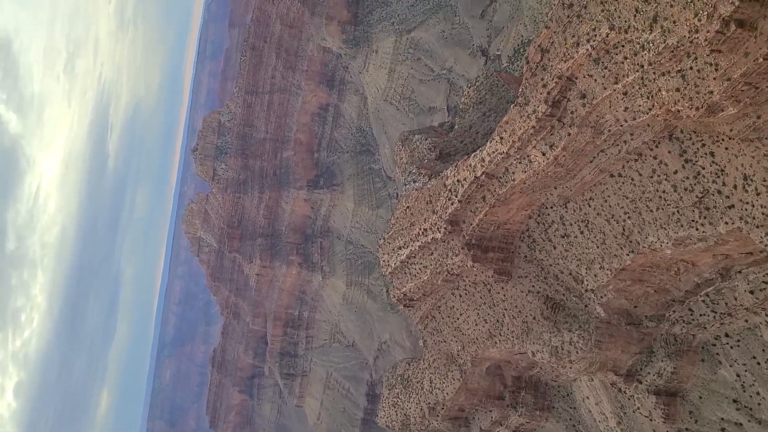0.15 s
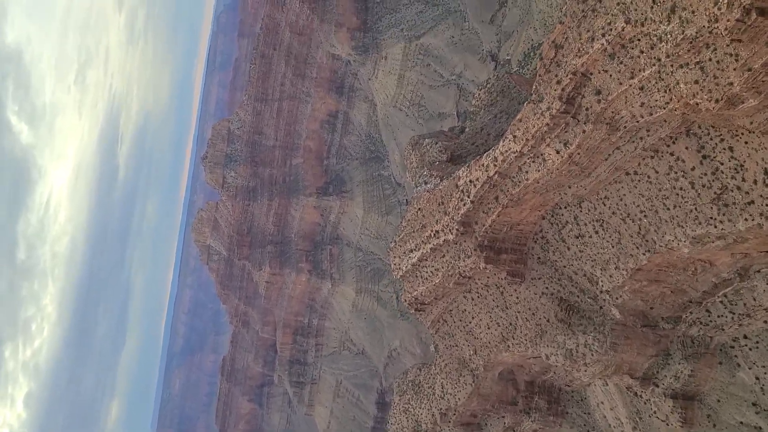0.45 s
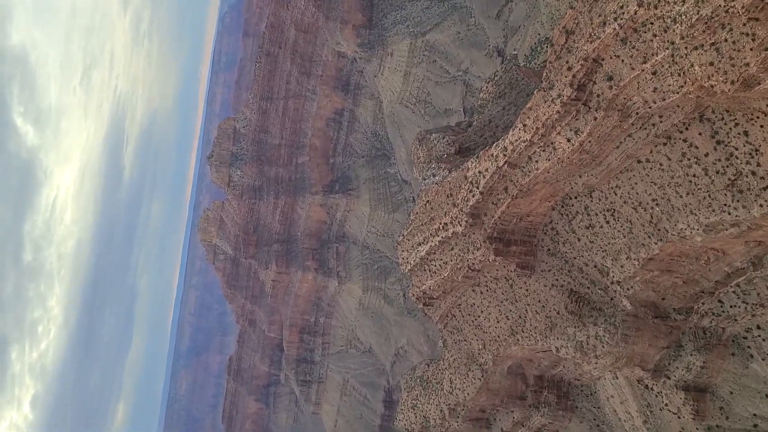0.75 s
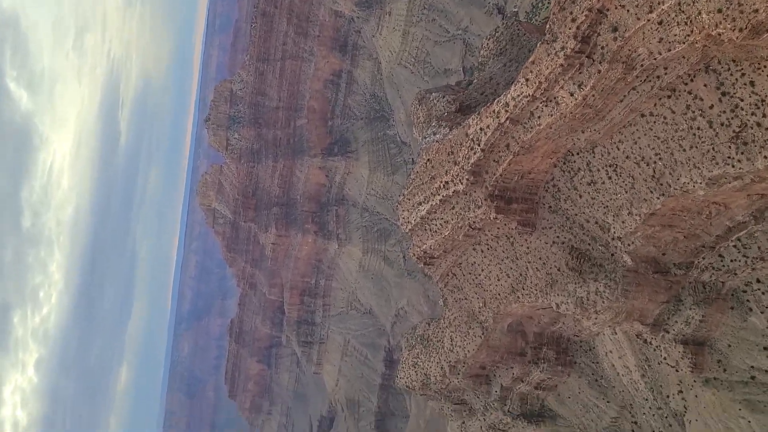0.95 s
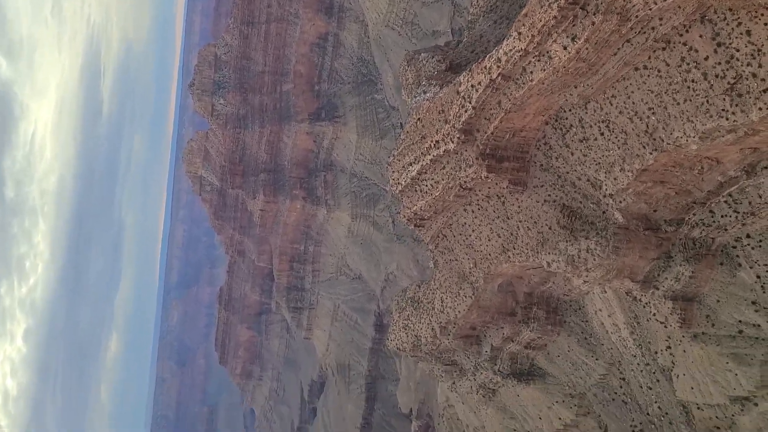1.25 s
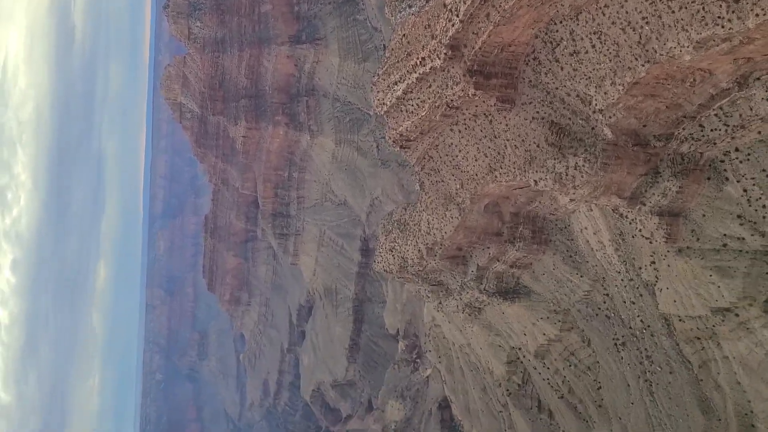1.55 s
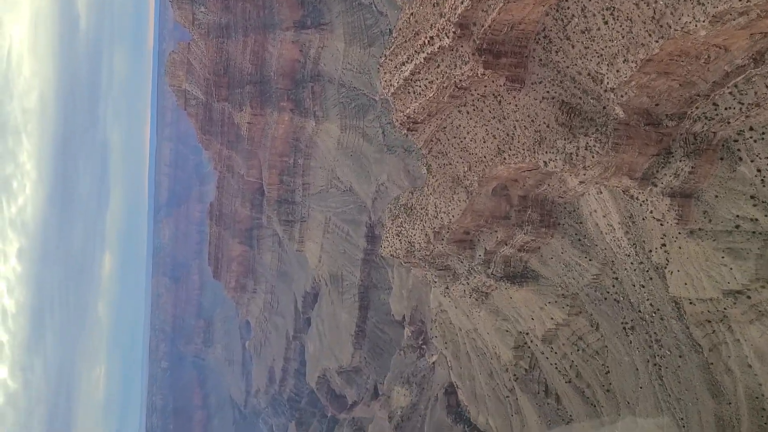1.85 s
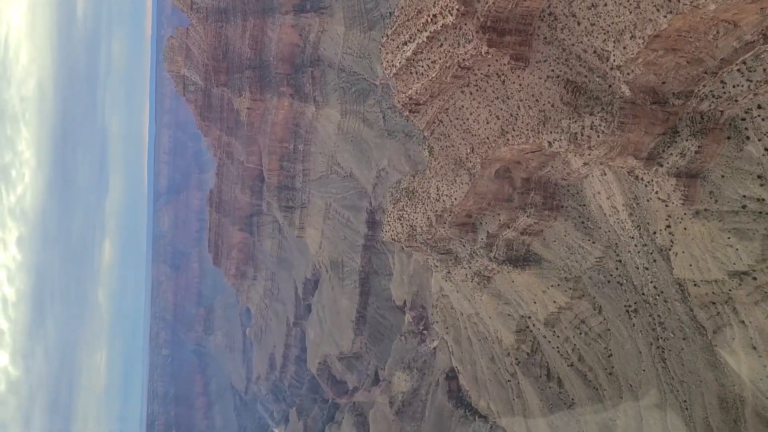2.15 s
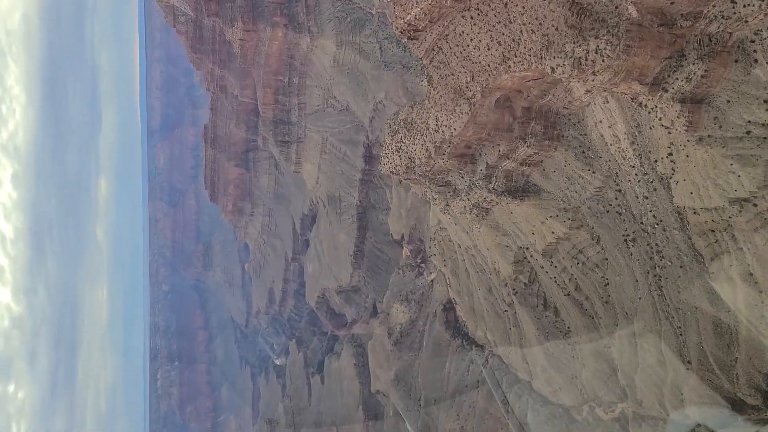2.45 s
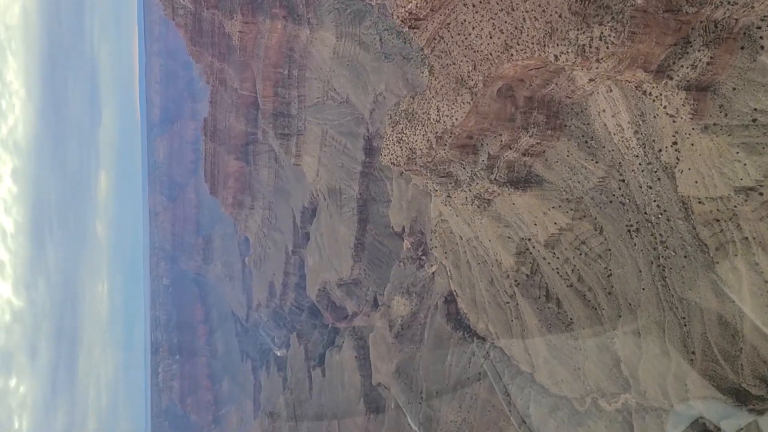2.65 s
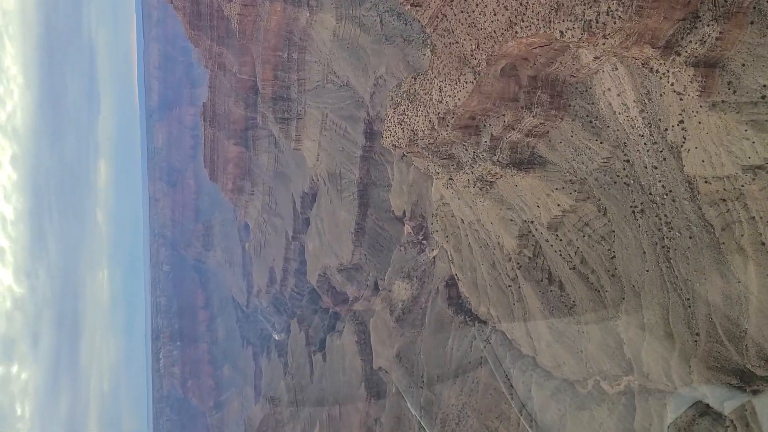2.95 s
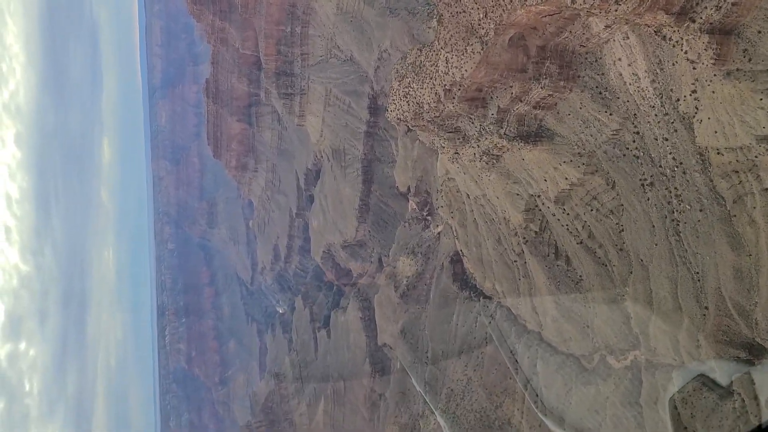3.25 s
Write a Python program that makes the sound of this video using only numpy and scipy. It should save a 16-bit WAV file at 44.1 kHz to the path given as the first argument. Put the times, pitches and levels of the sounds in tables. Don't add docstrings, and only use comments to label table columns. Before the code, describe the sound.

A loud steady helicopter cabin drone over a canyon: deep blade thumping shakes the hull, gears whine sharply above it, air roars and a faint turbine sings on top; close microphones, bass centred.

```python
import sys
import numpy as np
from scipy import signal
from scipy.fft import rfft, irfft
from scipy.io import wavfile

SR = 44100
rng = np.random.default_rng(int(sys.argv[2]) if len(sys.argv) > 2 else 0)


def volts(x):
    e = np.asarray(x, float) / 20
    return 10 ** e


def to_wav(s):
    ch = np.atleast_2d(s).T
    pcm = np.round(np.clip(ch, -1, 1) * 32767)
    wavfile.write(sys.argv[1], SR, pcm.astype(np.int16))


N = 149940

TEETH, BLADES = 100, 3
THROB_TURNS, CHOP_TURNS = -.083, .6


def read(points, hz):
    f, value = np.transpose(points)
    return np.interp(np.log(hz + 1), np.log(f + 1), value)


def drift(rate_hz):
    t = np.arange(0, N + 200, 200) / SR
    f = np.geomspace(.2, rate_hz, 16)[:, None]
    sines = np.sin(2 * np.pi * (f * t + rng.random((16, 1))))
    slow = (sines / np.sqrt(f)).sum(0)
    return np.interp(np.arange(N) / SR, t, (slow - slow.mean()) / slow.std())


def tone(turns):
    return np.sqrt(2) * np.cos(2 * np.pi * turns)


def stereo(left, right):
    return np.array([[left], [right]])


def wash(colour_db, lean):
    # frequency in Hz, correlation from -1 to 1.
    likeness = [(60, .98), (250, .9), (345, .52), (520, .66), (690, 0), (900, -.58), (1150, -.55),
                (1350, -.2)]
    hz = np.fft.rfftfreq(N, 1 / SR)
    a, b = rfft(rng.standard_normal((2, N)))
    same = read(likeness, hz) / (1 + (hz / 4000) ** 2)
    half_lean_db = read(lean, hz) / 2
    left = a * volts(half_lean_db)
    right = (same * a + np.sqrt(1 - same ** 2) * b) * volts(-half_lean_db)
    return irfft(np.array([left, right]) * volts(colour_db(hz)) * np.sqrt(SR / 2), N)


def rotor():
    # time in seconds, fifth tooth overtone in Hz, strength in dB.
    speed_curve = [
        (0, 3280.6, -41),
        (.75, 3281.9, -40),
        (1.1, 3281.2, -42.5),
        (1.5, 3279.8, -44),
        (2.4, 3280.1, -45),
        (2.85, 3281.6, -44.5),
        (3.4, 3281, -45.5),
    ]
    aligned_s = 1.7
    s, hz, db = np.transpose(speed_curve)
    t = np.arange(N) / SR
    turns = np.cumsum(np.interp(t, s, hz)) / (5 * TEETH * SR)
    strength_db = np.interp(t, s, db)
    return turns - turns[round(aligned_s * SR)], strength_db - strength_db.mean()


def airflow(turns):
    # frequency in Hz, density in dB per Hz.
    hull_boom = [(18, -48), (35, -51.5), (52, -43), (70, -37), (97, -37.5), (125, -43.5), (185, -48.5),
                 (300, -68)]
    # frequency in Hz, density in dB per Hz.
    cabin_roar = [(150, -55.5), (240, -43.5), (320, -51), (520, -52), (800, -54.5), (1250, -58.5),
                  (1550, -63), (6500, -90)]
    # frequency in Hz, width in Hz,
    # lift in dB (negative for a cut).
    panels = [(375, 41, 5), (662, 84, 3.5), (942, 46, 2), (1723, 90, 5), (2710, 140, 4), (2990, 240, 4.5),
              (3420, 31, -15)]
    # frequency in Hz, left minus right in dB.
    air_lean = [(160, 1), (260, -2), (450, 4), (700, 2.5), (1100, 3.5), (1700, 0.5), (2600, 4.5), (3600, 3)]

    def boom_db(hz):
        return read(hull_boom, hz) - 40 * (hz > 320)

    def roar_db(hz):
        ringing = sum(lift / (1 + (2 * (hz - f) / width_hz) ** 2) for f, width_hz, lift in panels)
        return read(cabin_roar, hz) + ringing - 40 * (hz < 90)

    chop = 1 + .04 * tone(BLADES * turns + CHOP_TURNS)
    return wash(boom_db, air_lean) + chop * wash(roar_db, air_lean)


def turbine(turns):
    # pitch in Hz, left level in dB, right level in dB,
    # pitch wander in Hz, level wander in dB, share of the swell from 0 to 1.
    compressor = [(11217, -54, -45.5, 2, 2.2, 1.0), (11757, -67, -58, 2.2, 2.5, .3),
                  (10680, -75, -66, 3, 3, 0)]
    # frequency in Hz, density in dB per Hz.
    hiss_colour = [(2000, -73), (3100, -69), (3700, -75), (5300, -79.5), (8000, -79.5), (11500, -77),
                   (14000, -81), (16000, -81)]
    # frequency in Hz, left minus right in dB.
    hiss_lean = [(2500, 2.5), (4000, 0), (6500, 2.5), (7800, 0), (9000, -4), (11500, -5), (14500, -3)]
    # time in seconds, level in dB.
    swell = [
        (0, -2),
        (.7, 2),
        (.9, -4),
        (1.42, -8),
        (1.5, 1),
        (1.85, 2),
        (1.95, -5),
        (2.37, 3),
        (3.4, -4),
    ]
    chop_depth, overtone_share, chop_from_hz, gust_db = .058, .45, 8500, .35

    blade = BLADES * turns + CHOP_TURNS
    beat = tone(blade) + overtone_share * (tone(2 * blade) + tone(3 * blade))
    chop = 1 + chop_depth * beat * (1 + .5 * drift(2))

    swell_db = np.interp(np.arange(N) / SR, *np.transpose(swell))
    tones = np.zeros((2, N))
    for hz, left_db, right_db, wander_hz, waver_db, share in compressor:
        level_db = stereo(left_db, right_db) + waver_db * drift(20) + share * swell_db
        cycles = np.cumsum(hz + wander_hz * drift(25)) / SR
        tones += volts(level_db) * tone(cycles + stereo(.2, 0))

    hiss = wash(lambda hz: read(hiss_colour, hz), hiss_lean)
    high_pass = signal.butter(2, chop_from_hz, 'high', fs=SR, output='sos')
    top = signal.sosfiltfilt(high_pass, hiss)
    return hiss - top + chop * volts(gust_db * drift(12)) * (tones + top)


def casing(turns):
    # frequency in Hz, width in Hz, left level in dB, right level in dB,
    # pitch wander in Hz.
    resonances = [(1305, 45, -39.5, -46, 4), (1366, 45, -35, -35.5, 13)]
    out = np.zeros((2, N))
    for hz, width_hz, left_db, right_db, wander_hz in resonances:
        spin = np.exp(2j * np.pi * np.cumsum(hz + wander_hz * drift(2)) / SR)
        r = np.exp(-np.pi * width_hz / SR)
        a, b = rng.standard_normal((2, 2, N))
        narrow = signal.lfilter([1], np.convolve([1, -r], [1, -r]), a + 1j * b)
        ring = (spin * narrow).real
        out += volts(stereo(left_db, right_db)) * ring / ring.std()
    return out * (1 + .14 * tone(turns + THROB_TURNS))


def gears(turns, strength_db):
    # multiple of the tooth rate, left level in dB, right level in dB,
    # left lead in turns, share of the strength curve as a factor.
    whine = [(1, -38, -40, .57, 0), (2, -42, -39, -.05, 0), (4, -46, -58, -.2, 0),
             (5, -43.5, -44, .14, 1.7), (6, -56, -49, -.23, 1.0), (7, -59, -56, .5, .3),
             (8, -54, -59, -.16, .5), (10, -68, -70, .3, 0)]
    pinion_teeth, shaft_ratio, waver_db = 17, 15.546, 1.3

    pinion_turns = pinion_teeth * shaft_ratio * turns + stereo(-.11, 0)
    out = volts(stereo(-51, -40.5) + waver_db * drift(3.84)) * tone(pinion_turns)

    throb_depth = stereo(1.3, 2.2) * np.exp(2j * np.pi * stereo(.1, -.09))
    throb = 1 + throb_depth * np.cos(2 * np.pi * (turns + THROB_TURNS))
    for k, left_db, right_db, lead, share in whine:
        spin = np.exp(2j * np.pi * (round(k) * TEETH * turns + stereo(lead, 0) + rng.random()))
        if round(k) == 2:
            spin = spin * throb
        level_db = stereo(left_db, right_db) + share * strength_db + waver_db * drift(14)
        out += volts(level_db) * np.sqrt(2) * spin.real
    return out


def thump(turns):
    # multiple of the blade rate, left level in dB, right level in dB.
    blade_orders = [(1, -36, -36), (2, -15, -15), (3, -25, -23.5), (4, -24, -24), (5, -29, -29)]
    # multiple of the rotor speed, level in dB.
    shaft_shakes = [(9.243, -24), (10.005, -35), (10.32, -34), (12.57, -34), (15.546, -28.5)]
    left_lead = stereo(-.016, 0)

    def lag(k):
        return .757 - .05 * (k - 3.5) - .125 * (k - 3.5) ** 2

    out = np.zeros((2, N))
    for k, left_db, right_db in blade_orders:
        level_db = stereo(left_db, right_db) + .75 * drift(2.84)
        out += volts(level_db) * tone(k * BLADES * turns + lag(k) + left_lead)
    for k, db in shaft_shakes:
        out += volts(db + 1.0 * drift(4.5)) * tone(k * turns + lag(k / BLADES) + left_lead)
    return out


def scene():
    turns, strength_db = rotor()
    background = airflow(turns) + turbine(turns)
    return background + casing(turns) + gears(turns, strength_db) + thump(turns)


def top_cut(x):
    return signal.sosfilt(signal.butter(12, 15725, fs=SR, output="sos"), x)


def record(dry):
    return top_cut(dry + .0027)


dry = scene()
out = record(dry)
to_wav(out)
```